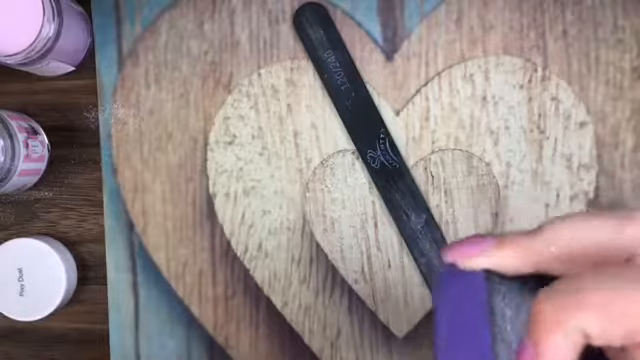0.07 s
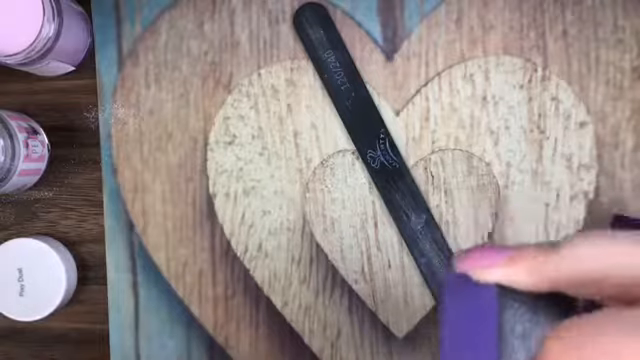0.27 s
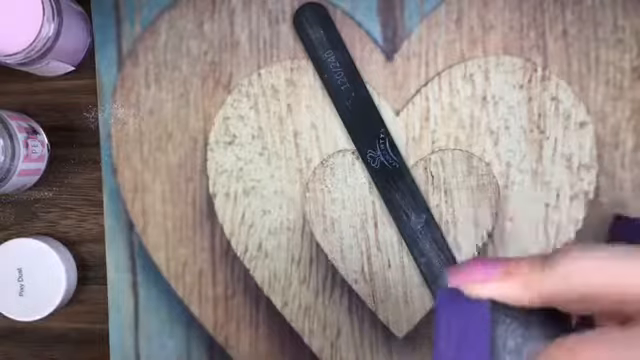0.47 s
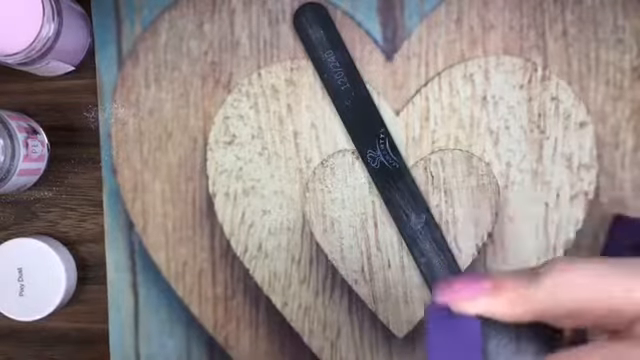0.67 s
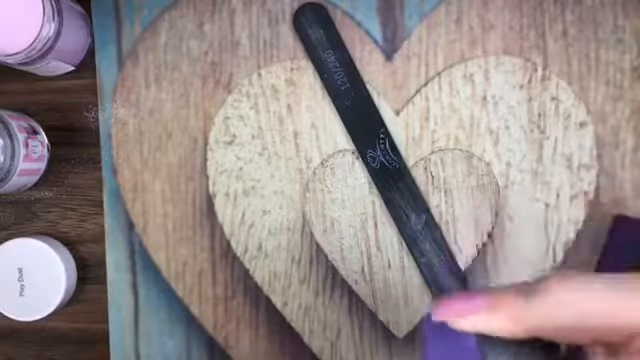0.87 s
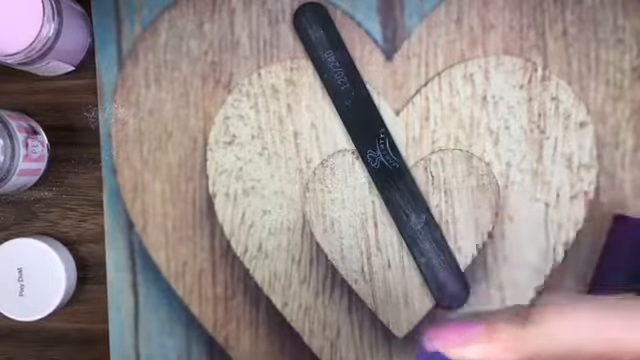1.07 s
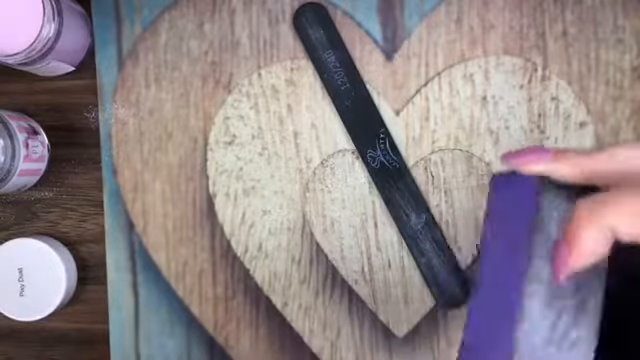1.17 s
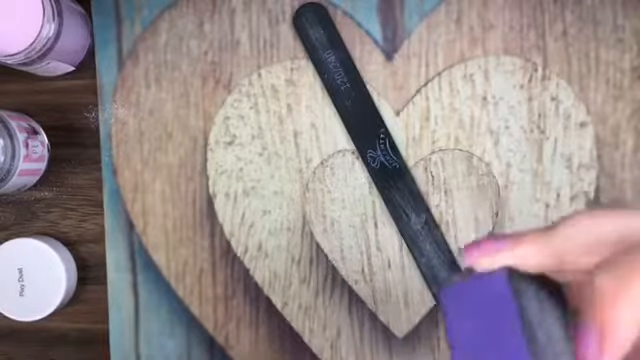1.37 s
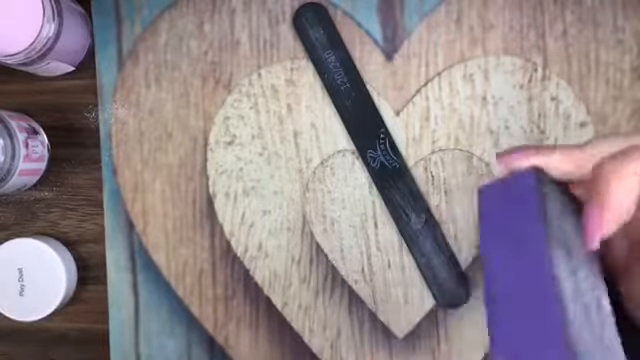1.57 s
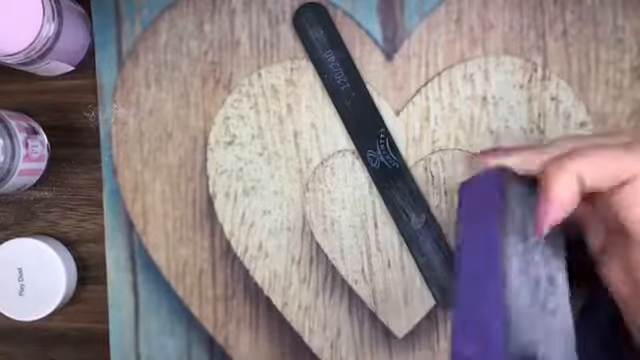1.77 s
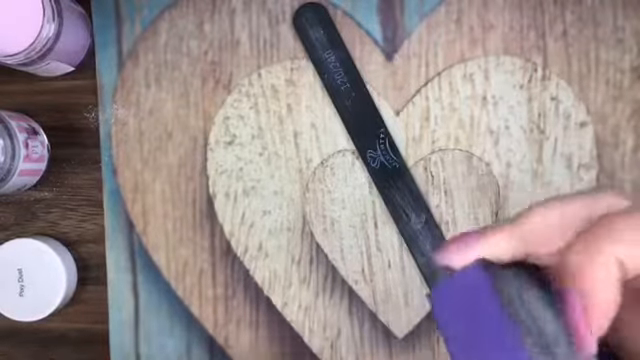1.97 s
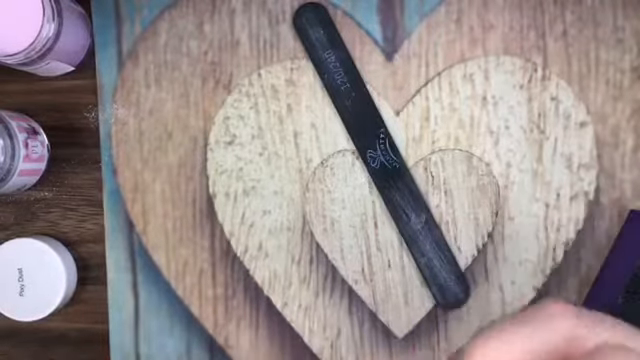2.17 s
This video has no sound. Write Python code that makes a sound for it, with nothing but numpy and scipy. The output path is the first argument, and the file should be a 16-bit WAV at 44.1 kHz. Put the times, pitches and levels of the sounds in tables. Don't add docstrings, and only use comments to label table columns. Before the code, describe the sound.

A nail buffer block scrubs a fingernail, close and mono in a small quiet room. From 0 to 1 s, bright, dry, gritty strokes alternate about eleven per second: abrupt pushes, softer swelling pulls. A hard flick snaps off at 1.06 s. After a pause, soft taps at 1.34 and 1.57 s each lead into a short rasp. Faint sleeve rubbing fades; one last faint tap at 2.2 s, over low motor hum.

```python
import sys
import numpy as np
from scipy import signal
from scipy.fft import rfft, irfft
from scipy.io import wavfile
from scipy.ndimage import uniform_filter1d

SR = 44100
rng = np.random.default_rng(int(sys.argv[2]) if len(sys.argv) > 2 else 0)


def field_ratio(decibels):
    return 10 ** (np.asarray(decibels, dtype=float) / 20)


def to_wav(sig):
    pcm = np.clip(np.atleast_2d(sig), -1, 1) * 32767
    pcm = np.round(pcm).astype(np.int16)
    wavfile.write(sys.argv[1], SR, pcm.T)


N = 97946

# f/Hz, density [dB per Hz]
GRIT = [(120, -53.5), (200, -14), (1320, -13.5), (1870, -15.5), (2090, -11), (2860, -6), (3430, -4),
        (15300, -14.5), (16500, -32.5)]


def level(x, db):
    return x * field_ratio(db) / np.sqrt(np.mean(x ** 2))


def band(x, hz, width_hz):
    return signal.lfilter(*signal.iirpeak(hz, hz / width_hz, fs=SR), x)


def colour(x, points):
    log_f = np.log(np.arange(N // 2 + 1) * SR / N + 1)
    hz, db = np.array(points).T
    return irfft(rfft(x) * field_ratio(np.interp(log_f, np.log(hz), db)), N)


def walk(rate_hz):
    hold = int(SR / rate_hz)
    held = rng.standard_normal(N // 20)[np.arange(N) // hold]
    return 1.13 * uniform_filter1d(uniform_filter1d(held, hold), hold)


def flutter(rate_hz):
    w = walk(rate_hz)
    return w - uniform_filter1d(w, SR // 16)


def hush():
    # f/Hz, density [dB per Hz]
    spectrum = [(25, -16), (85, -8), (150, -3.5), (320, -6.5), (900, -20.5), (2000, -26.5), (5500, -31.5),
                (15500, -41.5)]
    return level(colour(rng.standard_normal(N), spectrum), -64) * field_ratio(1.2 * walk(5))


def motor():
    # t/s, tone level/dB, overtone level/dB
    course = [(0, -68, -67), (.13, -66, -69), (.28, -77, -68.5), (.67, -66.5, -73), (1.0, -65.5, -65.5),
              (1.55, -66.5, -65.5), (1.9, -66.5, -79), (2.05, -74.5, -68), (2.22, -78, -68.5)]
    speed_waver = 0.0083
    t = np.arange(N) / SR
    times, *tone_levels = np.array(course).T
    out = np.zeros(N)
    for hz, db in zip((58.5, 122.8), tone_levels):
        phase = 2 * np.pi * np.cumsum(hz * (1 + speed_waver * walk(6))) / SR
        out += np.sqrt(2) * np.sin(phase) * field_ratio(np.interp(t, times, db))
    return out


def hum():
    # f/Hz, width [Hz], level/dB
    bands = [(162.7, 10, -70), (1122, 8, -83.5), (124.7, 40, -73), (40, 12, -78)]
    return sum(level(band(rng.standard_normal(N), hz, width), db) for hz, width, db in bands)


def room(x):
    t60_s, top_t60_s, split_hz, room_db = 0.23, 0.17, 4500, -12.5
    t = np.arange(SR // 2) / SR
    noise = rng.standard_normal(len(t)) * np.minimum(t / 0.005, 1)
    low = signal.lfilter(*signal.butter(2, split_hz, fs=SR), noise)
    tail = low * field_ratio(-60 * t / t60_s) + (noise - low) * field_ratio(-60 * t / top_t60_s)
    return signal.fftconvolve(x, tail / np.sqrt(np.sum(tail ** 2)))[:N] * field_ratio(room_db)


def bumps():
    # t/s, level/dB, f/Hz
    events = [
        (1.059, -48.5, 180),
        (1.089, -56, 65.6),
        (1.344, -60, 70),
        (1.577, -56.5, 86.4),
        (1.645, -57.5, 72.6),
    ]
    cycles = 2.45
    out, t = np.zeros(N + SR), np.arange(SR // 2) / SR
    for s, db, hz in events:
        swell = t * hz * np.exp(1 - 2 * t * hz / cycles)
        out[int(s * SR):][:len(t)] += field_ratio(db) * np.sin(2 * np.pi * hz * t) * swell
    return out[:N]


def ticks():
    # t/s, level/dB, f/Hz
    events = [
        (.426, -50, 14200),
        (1.21, -62, 10500),
        (1.2103, -62, 13600),
        (1.52, -55, 13000),
        (1.0653, -12.5, 4570),
        (1.3365, -52, 5520),
        (2.2039, -46, 5200),
    ]
    out, t = np.zeros(N + SR), np.arange(SR // 2) / SR
    for s, db, hz in events:
        out[int(s * SR):][:len(t)] += field_ratio(db) * np.sin(2 * np.pi * hz * t) * np.exp(-t / 0.00058)
    return out[:N]


def taps():
    # t/s, level/dB, brightness/dB, tick f/Hz
    events = [
        (1.338, -30.5, -4.5, 2880),
        (1.5671, -34.5, 5.5, 2860),
        (2.204, -44, 2, 4100),
    ]
    modes = [(1, -1.5, 0.0059), (1.3, -6.5, 0.0064), (1.9, -9, 0.0037), (3.1, -10, 0.0027)]
    top_hz, end_hz, glide_s, decay_s = 1516, 206, 0.00175, 0.0039
    crack_db, crack_s = -7, 0.0032
    out, t = np.zeros(N + SR), np.arange(SR // 2) / SR
    glide_hz = end_hz + (top_hz - end_hz) * np.exp(-t / glide_s)
    knock = np.sin(2 * np.pi * np.cumsum(glide_hz) / SR) * np.exp(-t / decay_s)
    knock = knock * np.minimum(t / 0.0011, 1)
    for s, db, bright_db, tick_hz in events:
        tick = np.zeros(len(t))
        for ratio, mode_db, t60_s in modes:
            tick += field_ratio(mode_db) * np.sin(2 * np.pi * ratio * tick_hz * t) * field_ratio(-60 * t / t60_s)
        crack = band(rng.standard_normal(len(t)), 0.77 * tick_hz, 1.2 * tick_hz) * np.exp(-t / crack_s)
        tick = (tick + field_ratio(crack_db) * crack) * np.minimum(t / 0.00065, 1)
        out[int(s * SR):][:len(t)] += field_ratio(db) * (knock + field_ratio(bright_db) * tick)
    return out[:N]


def snags():
    # t/s, level/dB, f/Hz, length [s]
    strong = [(0.01, -32.5, 4900, 0.0069), (0.028, -40.5, 1930, 0.0046), (0.092, -37, 4670, 0.009),
              (0.171, -35.5, 3300, 0.0073), (.215, -44, 1920, 0.012), (0.363, -35.5, 4100, 0.0089),
              (0.41, -36.5, 2100, 0.008), (0.473, -42, 5200, 0.0054), (0.491, -38, 3500, .012),
              (.548, -29.5, 4170, 0.0051), (.55, -42.5, 950, 0.0087), (0.583, -33.5, 3000, 0.006),
              (.599, -30, 1950, 0.0053), (0.677, -38.5, 3450, 0.015), (0.735, -46.5, 1190, 0.012),
              (0.781, -33.5, 2920, 0.015), (0.915, -34, 3380, 0.012), (0.962, -33.5, 3430, 0.011),
              (1.058, -25, 4800, 0.0035), (1.0651, -21.5, 5000, 0.0018), (1.07, -28.5, 5570, 0.0046),
              (1.074, -24, 3000, 0.003), (1.377, -36, 4500, 0.011), (1.596, -29.5, 3850, 0.0052),
              (1.624, -41, 1000, 0.0038), (1.632, -35.5, 3280, 0.0069), (1.063, -35, 974, 0.015),
              (1.048, -38.5, 1290, 0.015), (1.41, -43.5, 4400, .016), (1.694, -51, 3280, .012),
              (1.082, -46, 14500, .014), (1.075, -44, 13500, .004), (1.694, -53, 9200, 0.01),
              (1.706, -51, 9000, .01), (1.71, -57, 5000, 0.013), (1.619, -44, 9000, .012)]
    # t/s, level/dB, f/Hz
    light = [(0.011, -45, 2140), (0.013, -44, 3100), (0.086, -46, 2140), (0.118, -43, 3400),
             (0.131, -48, 3420), (0.205, -40.5, 4550), (0.275, -39, 4550), (0.302, -50, 3420),
             (0.315, -49, 1450), (0.36, -53, 2020), (0.374, -43, 3130), (0.404, -38.5, 2820),
             (0.458, -46, 3420), (0.483, -40, 2580), (0.491, -39.5, 7330), (0.549, -42, 2060),
             (0.739, -54, 2120), (0.743, -36, 3800), (0.769, -36, 2880), (0.778, -38.5, 4550),
             (0.783, -51, 1880), (0.851, -37, 4550), (0.864, -39, 4140), (0.919, -45, 5500),
             (0.961, -41.5, 1880), (1.011, -45.5, 3420), (1.038, -34, 5000), (1.051, -32.5, 7330),
             (1.055, -35, 2300), (1.065, -37.5, 1360), (1.07, -38, 8800), (1.34, -56, 900),
             (1.387, -41, 3450), (1.409, -44, 2600), (1.634, -38, 4550), (1.635, -41, 2120)]
    light_db, light_s, q = 1.3, 0.0096, 9.4
    events = strong + [(s, db + light_db, hz, light_s) for s, db, hz in light]
    t, out = np.arange(-1024, 1024) / SR, np.zeros(N + 2048)
    for s, db, hz, length_s in events:
        scrape = rng.standard_normal(len(t)) * np.exp(-(2 * t / length_s) ** 2)
        ring = band(scrape, hz, hz / q)
        gain = field_ratio(db) * np.sqrt(length_s * SR / 2 / np.sum(ring ** 2))
        out[int(s * SR):][:len(t)] += ring * gain
    return out[len(t) // 2:][:N]


def strokes(rows, body, grit_colour, attack_s, release_s, bite_db, grit_db=0):
    rub_db, bite_s = -12, 0.012
    t = np.arange(N) / SR
    press, place, ring_db = np.zeros(N), np.zeros(N), np.zeros(N)
    for start_s, length_s, db, swell_db, ring in rows:
        u = t - start_s
        ramp = np.minimum(u / attack_s, (length_s + release_s / 2 - u) / release_s)
        edge = np.sin(np.pi / 2 * np.clip(ramp, 0, 1)) ** 2
        along = np.clip(u / length_s, 0, 1)
        bite = bite_db * np.exp(-np.abs(u) / bite_s)
        press += edge * field_ratio(db + swell_db * (along - 0.5) + bite)
        touching = edge > 0
        place[touching], ring_db[touching] = along[touching], ring

    grains = rng.standard_normal(N) * field_ratio(1.13 * rng.exponential(size=N))
    grit = level(grains, 0) * field_ratio(1.5 * walk(220))
    out = level(colour(grit, grit_colour), 6.5 + rub_db + grit_db) * press
    for hz in 1500 * 1.45 ** np.arange(7):
        out = out + band(out, hz, hz / 3) * (field_ratio(flutter(59.6)) - 1)

    for k, (hz, width, first_db, last_db) in enumerate(body):
        db = first_db + (last_db - first_db) * place ** 1.73 + 2 * flutter(69.85)
        if k == 0:
            db = db + ring_db
        out = out + band(grit * press * field_ratio(db + rub_db), hz, width) * np.sqrt(SR / np.pi / width)
    return out


def sleeve():
    rows = [
        (-.04, 1.1, -68.5, -0.7, 7.5),
        (1.64, .12, -61, 0, 11),
        (1.75, 0.24, -69.5, -2, 0),
        (1.88, .08, -72.5, -1, -6),
        (1.97, 0.23, -77.5, -2, -6),
    ]
    # f/Hz, width [Hz], level at start/dB, at end/dB
    body = [(282, 230, 3.5, -2.5), (904, 890, 9, -3.5)]
    return strokes(rows, body, GRIT, attack_s=0.048, release_s=0.048, bite_db=0.3)


def singles():
    rows = [(1.357, 0.064, -36, -3, 7), (1.593, 0.047, -32.5, 1, 4.5), (1.689, 0.044, -48, -7, 9),
            (1.337, .026, -51, 12, -21), (1.573, 0.024, -47.5, 4, -5), (1.642, 0.023, -61, -6, 12),
            (1.074, 0.014, -38, -5.5, -1), (0.52, 0.014, -45.5, -5, -11), (.42, .01, -47, -4, -11),
            (0.84, 0.01, -47, -4, -9), (1.735, 0.011, -59, -4, 2), (0.244, .02, -50, 6, -5),
            (.328, 0.028, -52.5, 4, -5), (.712, 0.027, -50, 3, -5), (.437, .012, -53, 3, -5),
            (.622, .015, -54, 3, -5)]
    # f/Hz, width [Hz], level at start/dB, at end/dB; first follows the ring column
    body = [(1060, 1500, -14.5, -4.5), (2100, 340, -30.5, -7.5), (3140, 870, -3.5, -16),
            (4100, 220, -8, -8.5), (4900, 450, -3.5, -13.5), (8700, 730, -3, -12),
            (12000, 6700, -0.5, -7.5), (6080, 890, -9.5, -12.5)]
    return strokes(rows, body, GRIT, attack_s=0.0073, release_s=0.012, bite_db=0.25)


def flick():
    rows = [
        (1.004, .072, -30.5, 16, 3),
    ]
    # f/Hz, width [Hz], level at start/dB, at end/dB; first follows the ring column
    body = [(1430, 190, -16.5, -2.5), (305, 160, -28, -9.5), (950, 67, -19, -12), (2100, 160, -16.5, -4),
            (3000, 790, -0.5, 3), (4800, 400, -2.5, 1.5), (6150, 500, -4, 0.5), (8000, 2800, -4, -14.5),
            (13000, 6000, 1, -22)]
    return strokes(rows, body, GRIT, attack_s=0.0099, release_s=0.0034, bite_db=1.2, grit_db=-3.5)


def pulls():
    rows = [
        (.066, 0.064, -35.5, -1, 1),
        (.252, 0.076, -35.5, -4, 3.5),
        (.439, 0.071, -33, 4.5, -1),
        (.631, 0.078, -35, -4, -1),
        (.816, 0.067, -34.5, 0, -2),
    ]
    # f/Hz, width [Hz], level at start/dB, at end/dB; first follows the ring column
    body = [(1400, 230, -18, -1), (950, 120, -14, -9), (2104, 110, -7.5, -9.5), (3450, 130, -2.5, -7.5),
            (4550, 370, -0.5, -9), (5200, 160, -1.5, -15.5), (7140, 800, -4.5, -9.5),
            (11700, 13000, -2, -7)]
    return strokes(rows, body, GRIT, attack_s=0.019, release_s=0.051, bite_db=-8.5)


def pushes():
    rows = [
        (-.04, 0.069, -33, -1.5, 2),
        (.168, 0.058, -35, 1.5, -1),
        (.354, 0.065, -33.5, 2, 1.5),
        (.545, 0.063, -32.5, 0.5, 1.5),
        (.733, 0.06, -32.5, 2.5, -2),
        (.911, .058, -32.5, 4, -1.5),
    ]
    # f/Hz, width [Hz], level at start/dB, at end/dB; first follows the ring column
    body = [(2016, 165, -20.5, 5), (970, 110, -13, -21.5), (3000, 160, -14.5, -0.5), (3480, 120, -6.5, -7),
            (4500, 970, -3, -10.5), (5200, 1900, -5, -14), (9580, 5300, -3.5, -10)]
    # f/Hz, density [dB per Hz]
    grit_colour = [(120, -51), (200, -14.5), (943, -16.5), (1290, -32), (1800, -10), (2960, -5.5),
                   (14200, -11.5), (15600, -11), (16500, -36.5)]
    return strokes(rows, body, grit_colour, attack_s=0.0045, release_s=0.023, bite_db=0.5)


def scene():
    near = bumps() + ticks() + taps() + snags() + sleeve() + singles() + flick() + pulls() + pushes()
    mono = near + room(near) + hush() + motor() + hum()
    return np.array([mono, mono])


def low_pass(x):
    return signal.sosfilt(signal.butter(12, 16220, fs=SR, output="sos"), x)


def record(dry):
    return low_pass(dry)


dry = scene()
out = record(dry)
to_wav(out)
```